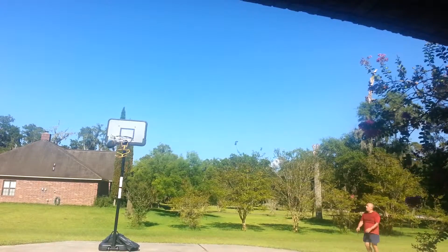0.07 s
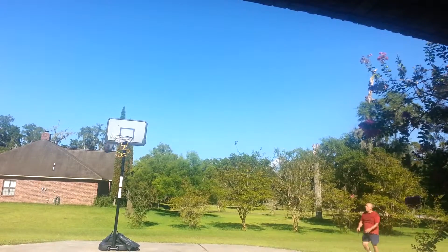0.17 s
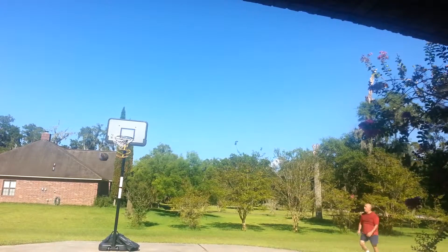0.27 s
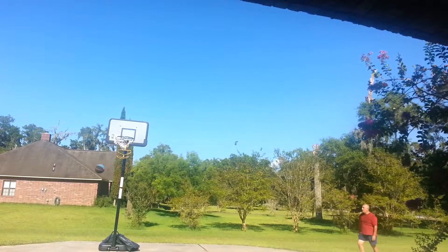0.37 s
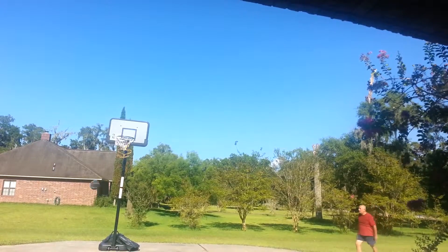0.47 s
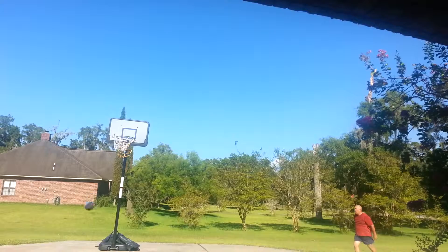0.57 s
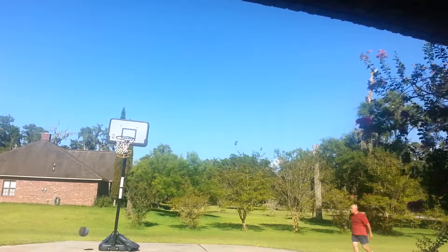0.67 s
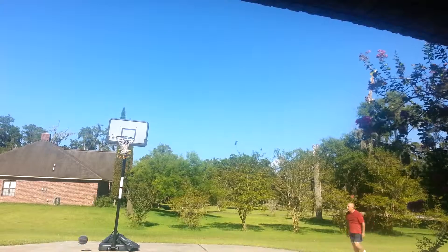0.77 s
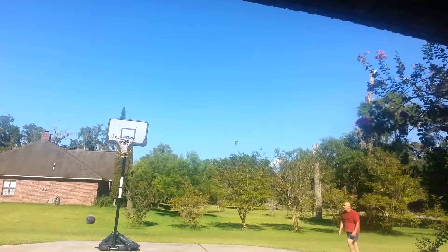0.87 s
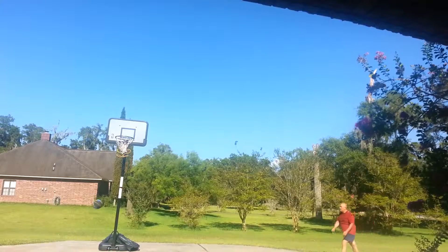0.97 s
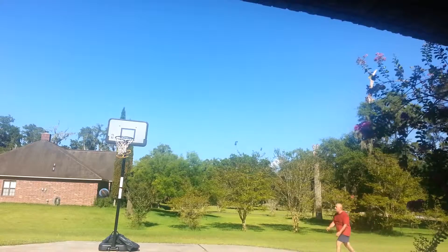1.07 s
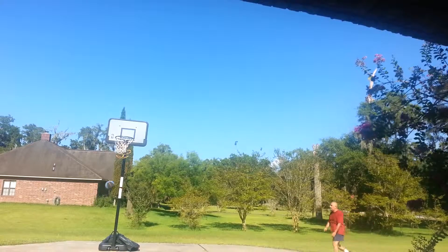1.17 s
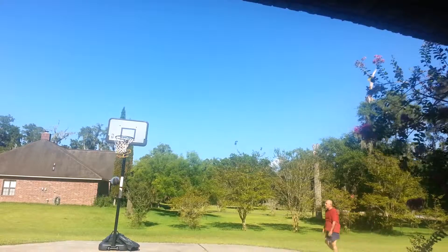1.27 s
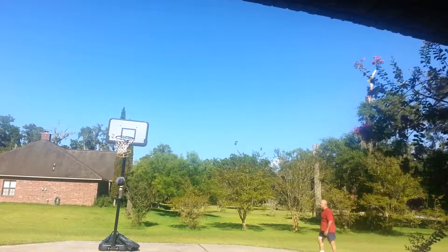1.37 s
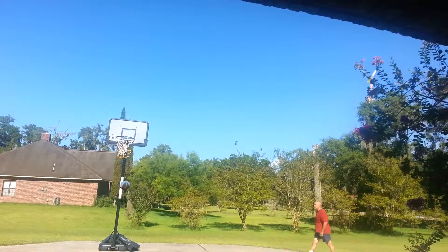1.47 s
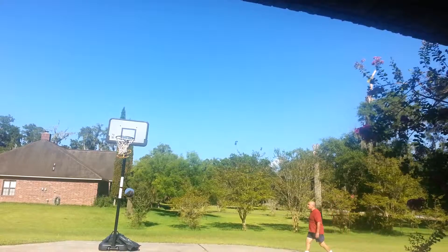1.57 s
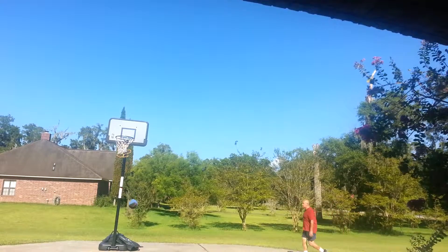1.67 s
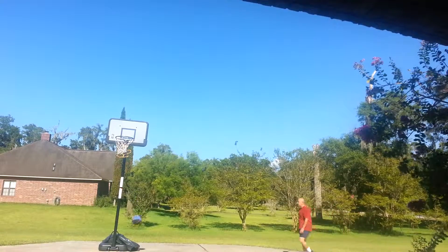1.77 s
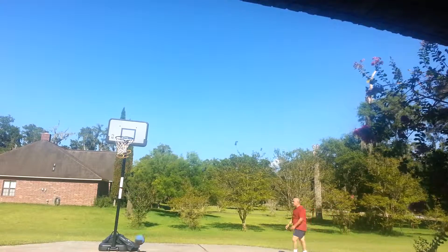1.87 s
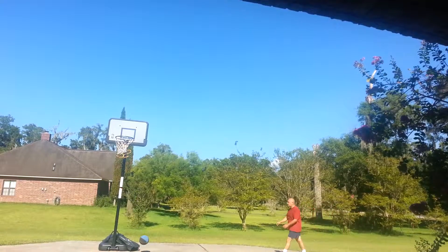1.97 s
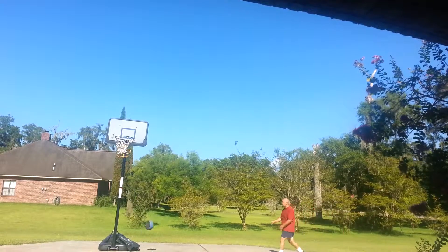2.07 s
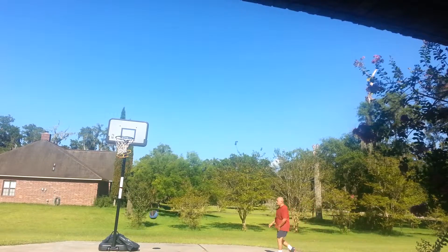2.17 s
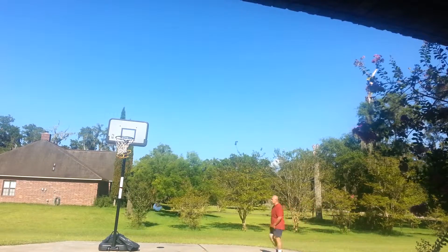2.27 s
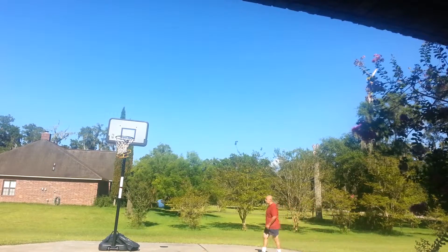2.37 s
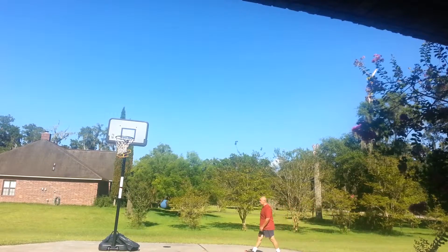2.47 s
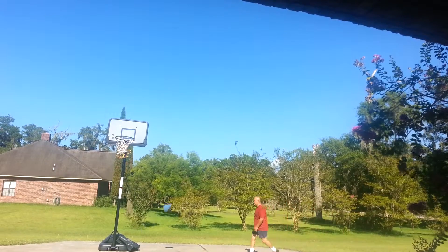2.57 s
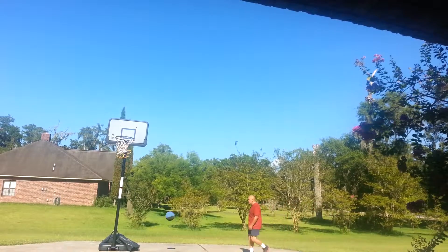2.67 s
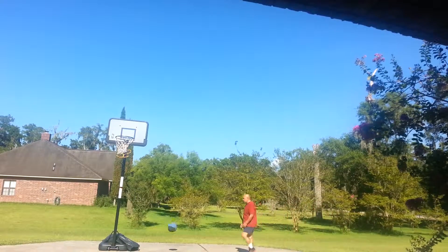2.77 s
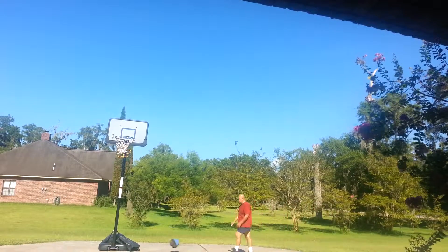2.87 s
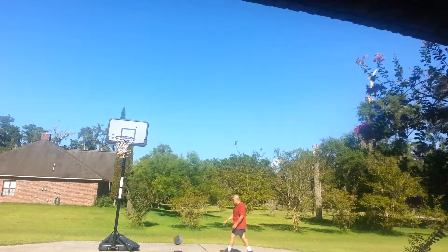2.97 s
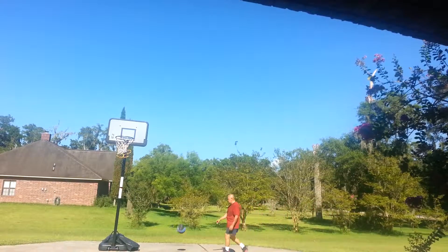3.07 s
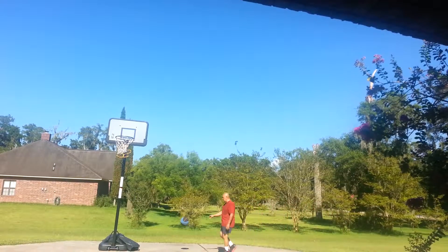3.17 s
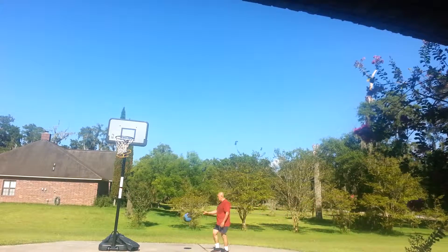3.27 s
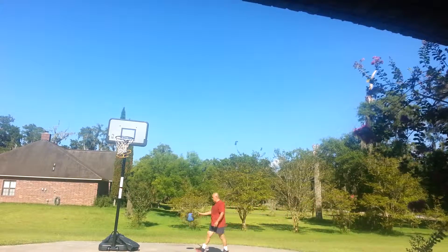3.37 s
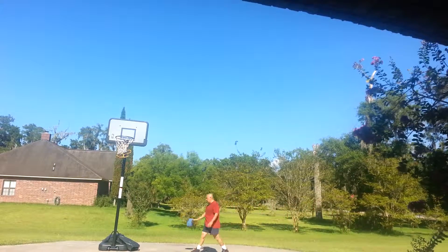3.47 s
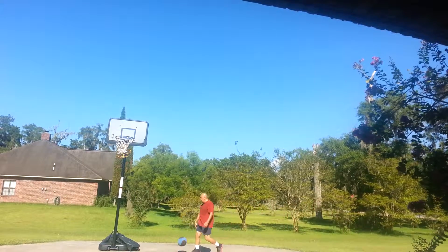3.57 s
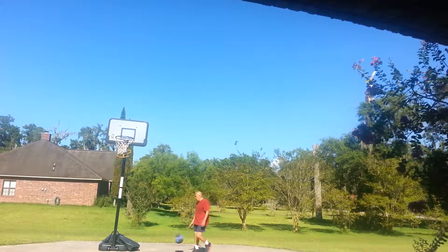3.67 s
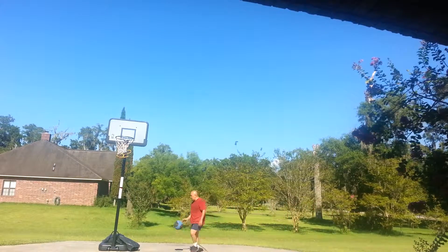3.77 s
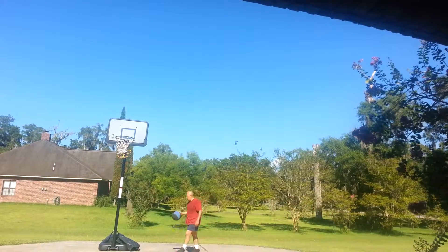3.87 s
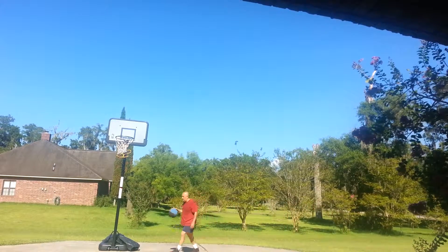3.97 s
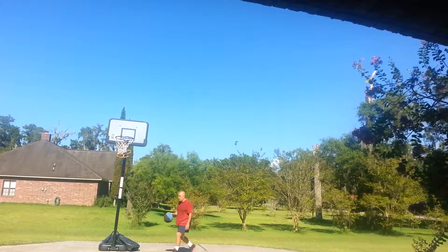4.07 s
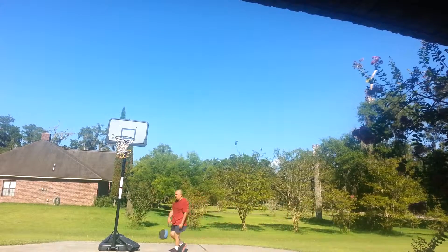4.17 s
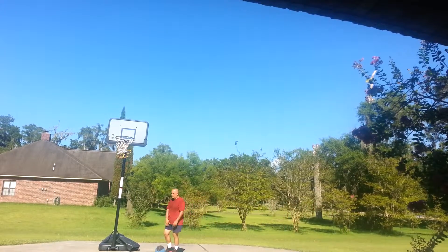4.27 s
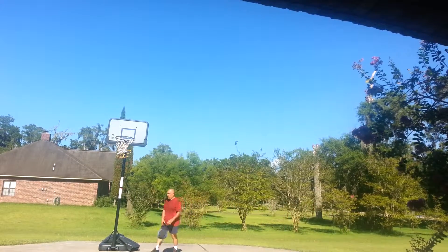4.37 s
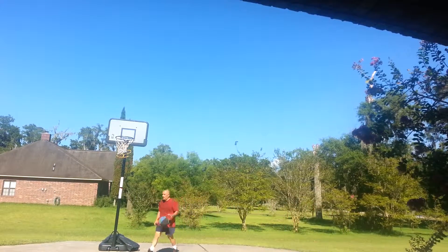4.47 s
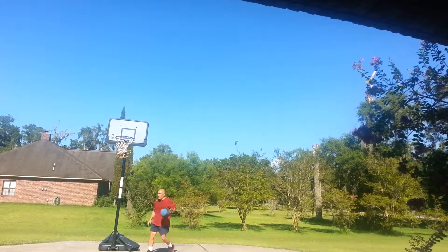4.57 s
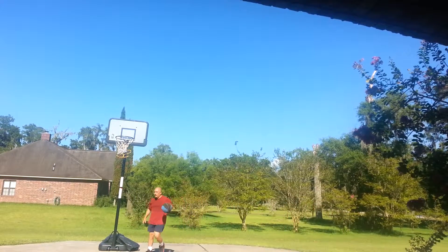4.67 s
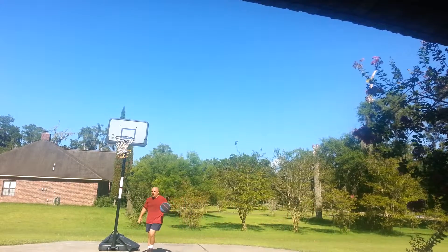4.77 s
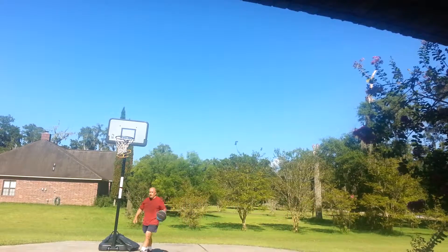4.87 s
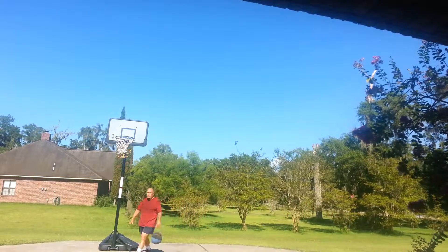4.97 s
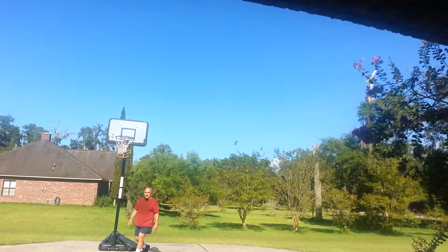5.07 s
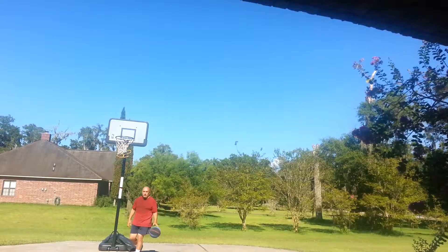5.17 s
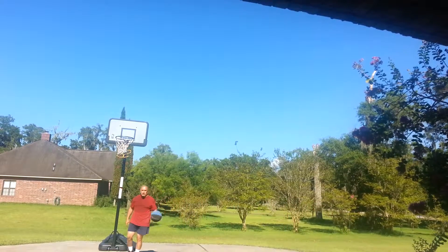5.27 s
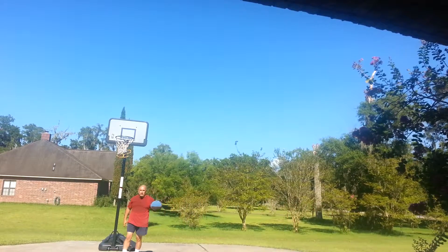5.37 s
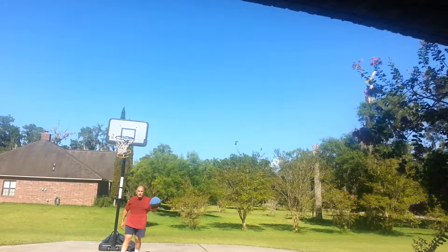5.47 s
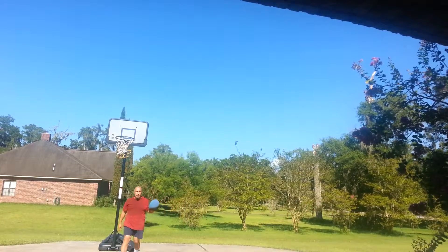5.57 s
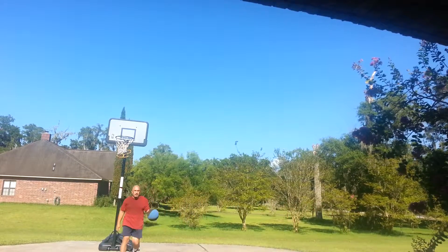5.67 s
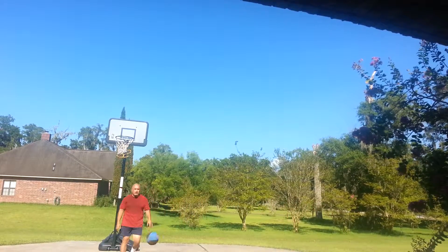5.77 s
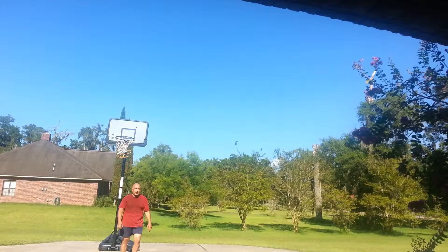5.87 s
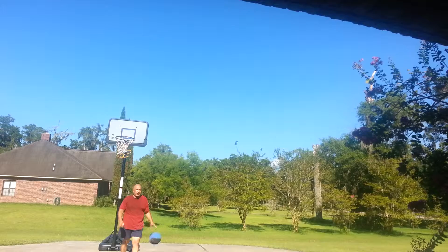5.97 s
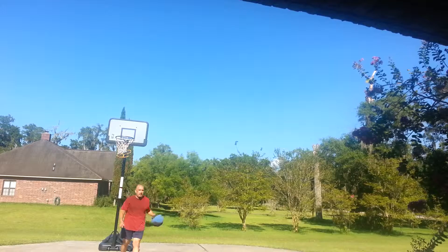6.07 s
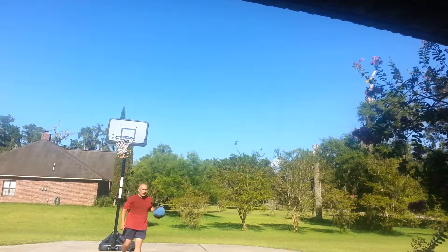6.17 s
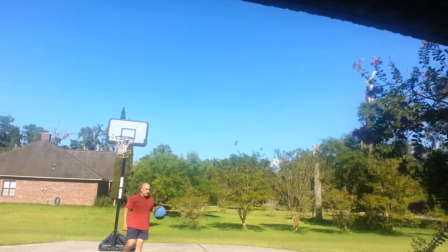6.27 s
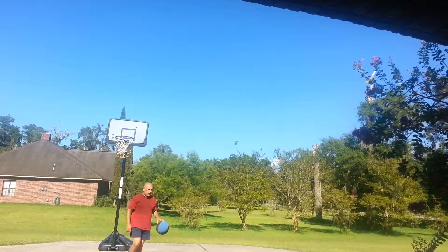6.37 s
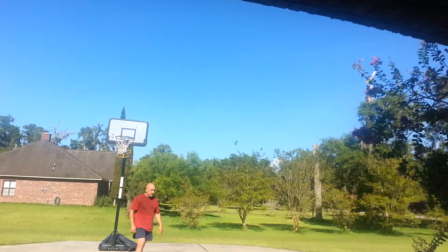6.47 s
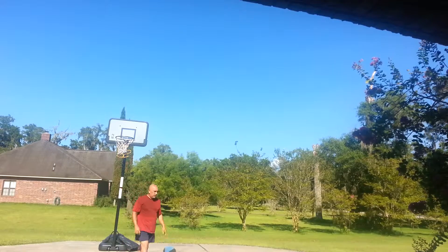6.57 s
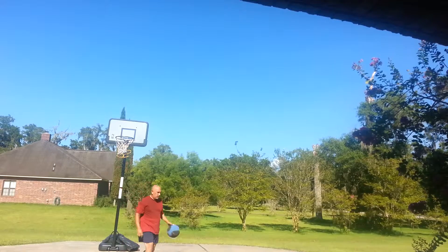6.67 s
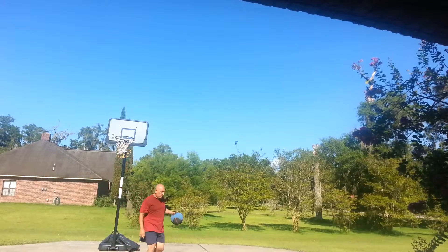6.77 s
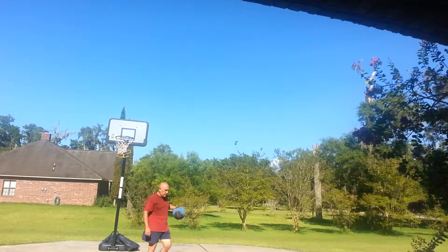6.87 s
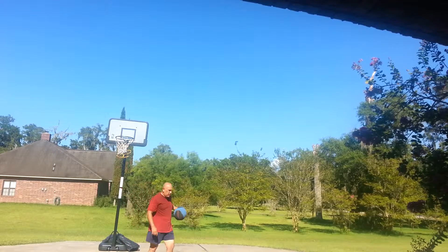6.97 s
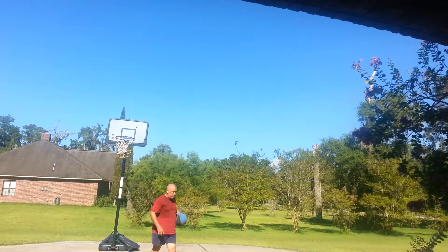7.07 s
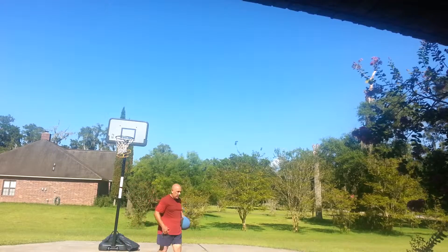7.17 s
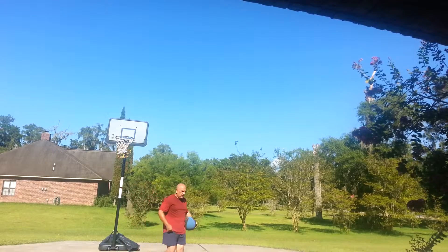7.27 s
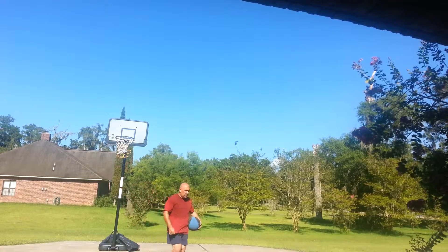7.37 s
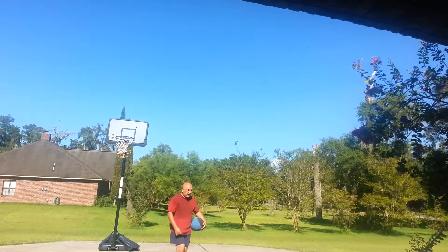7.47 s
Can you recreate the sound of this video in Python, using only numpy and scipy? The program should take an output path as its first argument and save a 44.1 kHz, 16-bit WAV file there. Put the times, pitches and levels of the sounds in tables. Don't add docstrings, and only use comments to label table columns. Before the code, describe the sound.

Hoop and board clatter briefly, then eight separate ball bounces smack concrete, growing closer and brighter, with shoe scuffs and quiet outdoor hum between.

```python
import sys
import numpy as np
from scipy import signal
from scipy.fft import rfft, irfft, next_fast_len
from scipy.io import wavfile
from scipy.ndimage import uniform_filter1d

SR = 44100
rng = np.random.default_rng(int(sys.argv[2]) if len(sys.argv) > 2 else 0)


def voltage_ratio(decibels):
    exponent = np.asarray(decibels, float) / 20
    return 10 ** exponent


def store_wav(level_fs):
    pcm = np.round(np.clip(np.atleast_2d(level_fs), -1, 1) * 32767)
    wavfile.write(sys.argv[1], SR, pcm.T.astype(np.int16))


N = 330730
TOP_HZ = 14700


def evened(x):
    return x / np.sqrt(np.mean(x ** 2) + 1e-20)


def read(points, hz):
    f, value = np.transpose(points)
    return np.interp(np.log(hz + 1), np.log(f + 1), value)


def add(mix, s, sound):
    part = mix[:, round(s * SR):][:, :sound.shape[-1]]
    part += sound[..., :part.shape[-1]]


def alike(a, b, same):
    same = np.clip(same, -1, 1)
    return np.array([a, same * a + np.sqrt(1 - same ** 2) * b])


def bands(hz, modes):
    return sum(db / (1 + (2 * (hz - f) / width) ** 2) for f, width, db in modes)


def coloured(x, modes, share):
    hz = abs(np.fft.fftfreq(x.shape[-1], 1 / SR))
    log_gain = share * bands(hz, modes) * np.log(10) / 20
    causal_gain = np.exp(np.conj(signal.hilbert(log_gain)))
    return np.fft.ifft(np.fft.fft(x) * causal_gain).real


def ring(modes, t, tilt_db=0., spread=0.015):
    hz, db, t60 = np.transpose(modes)[:, :, None]
    detune, strength = rng.standard_normal((2, len(modes), 1))
    gain = voltage_ratio(db + tilt_db * np.log2(hz / 2000) + 1.6 * strength - 60 * t / t60)
    return (gain * np.sin(2 * np.pi * hz * (1 + spread * detune) * t)).sum(0)


def slap(ms, width_ms):
    u = ms / width_ms
    return np.exp(-abs(u) ** 1.14) - 0.14 * np.exp(-(u - 2.2) ** 2 / 9.6)


# f/Hz, level/dB
SPIN_TONES = [(2896, -1), (2905, -5), (2919, -6)]


def ping(t):
    out = 0
    for hz, db in SPIN_TONES:
        envelope = np.minimum(t / 0.13, 1) * voltage_ratio(db - 60 * t / 1.2)
        detuned_hz = hz + 6.45 * rng.standard_normal()
        out = out + envelope * np.sin(2 * np.pi * (detuned_hz * t + rng.random()))
    return out


# t/s, slap level/dB, brightness/(dB per octave), full second slap delay/ms or 0, lifted band f/Hz
BOUNCES = [
    (0.8629, 1.5, 0.23, 0, 756),
    (2.0464, -1.5, 0.5, 0, 950),
    (3.0355, -11, 0.15, 0.78, 1400),
    (3.736, -3, -1.03, 0, 1080),
    (4.3794, 0.03, -1.5, 0.52, 576),
    (5.1633, 2.17, 0.37, 0, 850),
    (5.9740, 4.63, 1.72, 0.25, 890),
    (6.6204, 2.3, 1.6, 0, 860),
]
# t/ms, level/dB
WALL_ECHOES = [(2.7, -19.5), (3.4, -27), (5.2, -14), (8.4, -20.5), (13.2, -13), (17.5, -38)]
# f/Hz, level/dB, time to die by 60 dB/s
BALL_AIR = [(1018, 11, 0.055), (1307, -3, 0.11), (1683, -9, 0.42), (2010, -8.5, 0.43), (2500, -1, 0.16),
            (2865, -2, 0.066), (3760, -40, 0.2)]
# f/Hz, width/Hz, level/dB
RUBBER_SHELL = [(960, 750, 0.4), (2340, 1660, 6.5), (3040, 240, -5.5), (4560, 3200, 3), (6100, 1900, -3.5),
                (1480, 850, -2), (13900, 6600, -7)]
# multiple of lifted band, relative width, level/dB
SLAB_ECHO = [(.6, 0.19, -2), (1.01, 0.23, 6), (1.85, 0.26, -1.5), (2.8, 0.12, -1), (3.9, .1, -4)]


def bounce(s, slap_db, tilt_db, gap_ms, strong_hz):
    def follows(base, per_db, per_tilt):
        return base + per_db * slap_db + per_tilt * tilt_db

    width_ms = follows(0.097, -0.0012, -0.023)
    thud_db, crack_db = follows(-15, 0.05, -2.1), follows(-20, 0, 3)
    ring_db, ping_db = follows(-36, 2.25, -4.5), follows(-53, 2.25, -1.5)
    far_db, tail_db = follows(-24.5, -0.9, 5), follows(-24, 0.78, -1.7)
    bass_db, length = follows(3, -0.33, 4.4), follows(0.96, 0.0011, 0.015)
    share, gap_ms = (0.25, gap_ms) if gap_ms > 0.1 else (0.043, 0.76)

    away = np.exp(-(s - BOUNCES[0][0]) / 0.62)
    lag_ms = 0.062 + (0.17 - 0.062) * away
    thud_hz = 151 + (104 - 151) * away
    lead_ms = 1.0
    ms = np.arange(SR // 10) * 1000 / SR - lead_ms - np.array([[lag_ms / 2], [-lag_ms / 2]])

    def both_slaps(at_ms, widen):
        first = slap(ms - at_ms, width_ms * widen)
        return first + share * slap(ms - at_ms - gap_ms, width_ms * widen)

    after = np.maximum(ms, 0) / 1000
    fall = 1 + np.exp(-after / 0.002)
    thud = -np.sin(2 * np.pi * thud_hz * after * fall) * voltage_ratio(-60 * after / 0.039)
    pebbles = uniform_filter1d(rng.standard_normal(ms.shape), size=3)
    crack = pebbles * np.exp(-(ms / 0.31) ** 2)
    echoes = 0
    for at_ms, db in WALL_ECHOES:
        echoes = echoes + voltage_ratio(db + 3.1 * rng.uniform(-1, 1, (2, 1))) * both_slaps(at_ms, 1.57)
    scatter = rng.standard_normal(12) * voltage_ratio(-0.9 * np.arange(12))
    far = sum(g * slap(ms - 66.2 - 0.51 * k, 0.031) for k, g in enumerate(scatter))
    blow = both_slaps(0, 0.7) + voltage_ratio(thud_db) * thud + voltage_ratio(crack_db) * crack + echoes + voltage_ratio(far_db) * far

    slab = [(strong_hz * ratio, wide * strong_hz * ratio, db) for ratio, wide, db in SLAB_ECHO]
    shell = RUBBER_SHELL + slab
    t = np.arange(SR) / SR
    sound = np.zeros((2, SR))
    add(sound, 0, voltage_ratio(slap_db) * coloured(blow, shell, 0.49))
    add(sound, lead_ms / 1000, (voltage_ratio(ring_db) * ring(BALL_AIR, t) + voltage_ratio(ping_db) * ping(t))[None])
    add(sound, 0.003, voltage_ratio(tail_db) * garage(tilt_db, bass_db, shell=shell, length=length))
    return s - lead_ms / 1000, sound


# f/Hz, level/(dB per Hz)
TAIL_COLOUR = [(24, -52), (40, -31), (86, -8.5), (135, -4.5), (196, -4.5), (306, -11), (527, -8),
               (597, -9.5), (866, -7.5), (1350, -6.5), (4560, -20), (9360, -32), (15000, -31)]
# f/Hz, time to die by 60 dB/s
TAIL_T60 = [(75, 0.31), (97, 0.62), (130, 0.21), (300, 0.57), (700, 0.64), (1500, 0.55), (3000, 0.64),
            (6000, 0.68), (12000, 0.81)]
# f/Hz, left-right likeness
TAIL_SAME = [(60, 1), (180, 0.99), (550, 0.64), (1650, -0.24), (4970, -0.013), (15000, 0.08)]
# f/Hz, width/Hz, level/dB
ROOM_TONES = [(104.7, 80, 10.5), (124.5, 28, -4.5), (163, 45, -5), (213.8, 23, 9.5), (266, 32, 6),
              (336.8, 3.7, 13), (390, 51, 9.5), (520.6, 14, 7.5)]
# t/s, spread/s, level/dB
ECHO_BUNCHES = [
    (0.013, 0.0048, 2.5),
    (0.073, 0.031, 1),
]


def garage(tilt_db=0., bass_db=0., colour=TAIL_COLOUR, shell=(), length=0.96):
    size = SR
    taps = rng.standard_normal((2, size)) * (rng.random((2, size)) < 0.13)
    hz, t, z = signal.stft(taps, SR, nperseg=512, noverlap=384)
    t60 = length * read(TAIL_T60, hz)[:, None]
    z = alike(*z, read(TAIL_SAME, hz)[:, None]) * voltage_ratio(-60 * t / t60)
    taps = signal.istft(z, SR, nperseg=512, noverlap=384)[1][:, :size]

    hz = np.fft.rfftfreq(size, 1 / SR)
    db = read(colour, hz) + bands(hz, ROOM_TONES + list(shell))
    db = db + tilt_db * np.log2(hz / 1000 + 0.084) + bass_db / (1 + (hz / 300) ** 2)
    tail = irfft(rfft(taps) * voltage_ratio(db) * (hz < TOP_HZ), size)
    t = np.arange(size) / SR
    tail *= np.clip(t / 0.00053, 0, 1) * np.clip((1 - t) / 0.3, 0, 1)
    tail *= voltage_ratio(sum(db * np.exp(-((t - s) / spread) ** 2) for s, spread, db in ECHO_BUNCHES))
    return tail / np.sqrt(np.mean(tail[:, :2000] ** 2))


def wet(dry, wet_db):
    tail = garage(colour=[(60, -7), (200, 3.5), (6000, 17.0), (14000, -20.0)])
    tail /= np.linalg.norm(tail[0])
    return dry + voltage_ratio(wet_db) * signal.fftconvolve(dry.mean(0)[None], tail, axes=1)[:, :N]


# t/s, ring level/dB, clatter level/dB
KNOCKS = [(.004, -26, -66), (0.013, -30, -53), (.026, -30, -40), (.037, -31, -35), (0.058, -41, -38),
          (0.071, -35.5, -48), (0.097, -50, -47), (0.107, -40, -51), (0.131, -69, -46)]
# f/Hz, level/dB, time to die by 60 dB/s
HOOP_TONES = [(400, -2, 0.14), (520, -15, 0.057), (840, -14, 0.18), (986, -2, 0.13), (1076, -7.5, 0.096),
              (1600, -11, .04)]
# f/Hz, level/(dB per Hz)
BOARD_COLOUR = [(35, -54), (60, -12), (325, -9), (399, -11), (437, 0.5), (846, -2.5), (993, -4),
                (1160, -2.5), (4180, -19.5), (11400, -37), (14000, -34)]
# t/s, level/dB, brightness/(dB per octave)
SHUDDERS = [(.002, -36, 1.5), (.03, -36, 3.4), (.2, -43.5, 4), (.34, -48, 0), (.45, -56.5, -4)]
# t/s, level/dB, weight of upper tones/(dB per octave)
CHINKS = [
    (.178, -38.5, -14),
    (.192, -48.5, 3.5),
    (.227, -50, -3),
    (.25, -57, -2),
    (.275, -63, -3),
]
# f/Hz, level/dB, time to die by 60 dB/s
METAL_TONES = [(2265, 3.5, 0.083), (2410, 0, 0.07), (3526, 1.7, 0.17), (4689, -8, 0.16), (5803, -18, .12),
               (7100, -4, .04)]


def hoop():
    knocks, chinks, shudder = np.zeros((3, 2, N))
    t = np.arange(SR // 5) / SR
    colour = voltage_ratio(read(BOARD_COLOUR, np.fft.rfftfreq(len(t), 1 / SR)))
    for s, ring_db, clatter_db in KNOCKS:
        clatter = evened(irfft(rfft(rng.standard_normal(len(t))) * colour, len(t)))
        clatter = clatter * voltage_ratio(clatter_db + 8.5 - 60 * t / 0.057)
        knock = voltage_ratio(ring_db) * ring(HOOP_TONES, t, spread=0.0043) + clatter
        add(knocks, s, knock[None] * np.clip(t / 0.00077, 0, 1))
    for s, db, tilt_db in SHUDDERS:
        board_tones = [(397, 39, 2.5), (980, 110, 3.6)]  # f/Hz, width/Hz, level/dB
        add(shudder, s, voltage_ratio(db) * garage(tilt_db, colour=BOARD_COLOUR, shell=board_tones))
    for s, db, tilt_db in CHINKS:
        hiss = np.diff(rng.standard_normal(len(t) + 1)) * voltage_ratio(-9 - 60 * t / 0.2)
        chink = ring(METAL_TONES, t, tilt_db, spread=0.0034) + hiss
        add(chinks, s, voltage_ratio(db) * chink[None] * np.clip(t / 0.00063, 0, 1))
    return wet(knocks, -4.5) + wet(chinks, -6.5) + shudder


# t/s, peak level/dB, centre f/Hz, length/ms
STEPS = [(.6, -53.5, 1500, 22), (1.606, -47.5, 1270, 30), (2.59, -45.5, 1090, 34), (2.789, -64, 1200, 8.6),
         (3.537, -45, 1980, 13), (3.556, -33, 1270, 4.6), (3.557, -34.5, 324, 14), (3.617, -48, 2500, 13),
         (3.647, -50, 5030, 4.5), (4.161, -53, 1220, 13), (5.548, -42, 129, 7.7), (5.57, -33, 124, 3.3),
         (5.595, -45.5, 2000, 45), (6.274, -42, 2190, 7.9), (6.43, -47.5, 600, 14), (6.55, -47, 303, 36),
         (7.22, -49, 1220, 15), (7.33, -53, 1200, 13)]


def steps():
    out, t = np.zeros((2, N)), np.arange(SR // 5) / SR
    for s, db, hz, ms in STEPS:
        grit = rng.standard_normal(len(t)) * voltage_ratio(1.1 * rng.exponential(1, len(t)))
        band = signal.butter(3, [hz * 0.22, hz * 1.62], "band", fs=SR, output="sos")
        puff = signal.sosfilt(band, grit) * t * np.exp(-t * 3000 / ms)
        add(out, s, voltage_ratio(db) * puff[None] / abs(puff).max())
    return wet(out, -1.1)


# f/Hz, level/(dB per Hz)
YARD_COLOUR = [(15, -50), (25, -0.5), (96, -5.5), (165, -6), (227, -10), (260, -4.5), (369, -10.5),
               (471, -8.5), (1000, -14), (1080, -14.5), (2370, -20), (2940, -19), (5460, -28.5),
               (14000, -26.5), (15600, -60)]
# f/Hz, left-right likeness
YARD_SAME = [(60, 0.8), (150, 0.38), (380, 0.47), (950, 0.12), (2380, -0.14), (5980, -0.025), (15000, 0.02)]
# f/Hz, width/Hz, level/dB
DRONES = [(98, 19, -61.5), (184.3, 25, -63), (467, 42, -67.5), (2570, 100, -84), (10600, 1700, -72.5)]


def yard():
    frames, hz = N // 512 + 5, np.fft.rfftfreq(2048, 1 / SR)
    a, b, c, d, patches = rng.standard_normal((frames, 1025, 5)).T
    patches = evened(uniform_filter1d(uniform_filter1d(patches, 20, 0), 8, 1))
    swell = evened(uniform_filter1d(rng.standard_normal(frames), 25))
    shape = voltage_ratio(read(YARD_COLOUR, np.minimum(hz, 13500))) * (hz < TOP_HZ)
    shape *= voltage_ratio(-54) / np.linalg.norm(shape)
    power = shape ** 2
    for f, width, db in DRONES:
        bump = 1 / (1 + (2 * (hz - f) / width) ** 4)
        power = power + voltage_ratio(2 * db) * bump / bump.sum()
    z = alike(a + 1j * b, c + 1j * d, read(YARD_SAME, hz)[:, None])
    z *= np.sqrt(power)[:, None] * voltage_ratio(1.0 * patches + 0.3 * swell)
    noise = signal.istft(z, nperseg=2048, noverlap=1536)[1][:, :N]
    return np.sqrt(power.sum()) * evened(noise)


# f/Hz, level/dB
WHINE = [(2552, -86), (2612, -86), (2640, -84), (2670, -86), (2850, -79)]


def whine():
    t = np.arange(N) / SR
    knots = np.linspace(0, t[-1], 40)
    out = np.zeros((2, N))
    for hz, db in WHINE:
        for ear in range(2):
            waver_db = 1.5 * np.interp(t, knots, rng.standard_normal(40))
            out[ear] += voltage_ratio(db + 3 + waver_db) * np.sin(2 * np.pi * hz * t + ear)
    return out


def scene():
    mix = yard() + hoop() + steps() + whine()
    for row in BOUNCES:
        add(mix, *bounce(*row))
    return mix * voltage_ratio([[-0.25], [0.25]])


def roll_off(x):
    return signal.sosfilt(signal.butter(12, 15810, fs=SR, output="sos"), x)


def record(dry):
    x = signal.sosfilt(signal.butter(4, 62, "high", fs=SR, output="sos"), dry)
    power_db = 10 * np.log10(abs(uniform_filter1d((x ** 2).mean(0), 900, origin=440)) + 1e-12)
    late_db = np.roll(power_db, round(0.0047 * SR))
    size = next_fast_len(N)
    z, hz = rfft(x, size), np.fft.rfftfreq(size, 1 / SR)
    for low_hz in np.arange(10300, 16000, 500):
        band = irfft(z * ((hz >= low_hz) & (hz < low_hz + 500)), size)[:, :N]
        luck = np.repeat(rng.standard_normal(N // 1536 + 1), 1536)[:N]
        luck = uniform_filter1d(luck, size=300)
        limit_db = -32.5 - 5 * (low_hz / 1000 - 11) + 11 * luck
        limit_db = np.maximum(limit_db, -43) if low_hz < TOP_HZ - 300 else -50
        x = x - band * np.clip((late_db - limit_db) / 2, 0, 1)
    x = signal.sosfiltfilt(signal.butter(6, 15000, fs=SR, output="sos"), x)
    return roll_off(np.clip(x, -1, 1))


dry = scene()
out = record(dry)
store_wav(out)
```